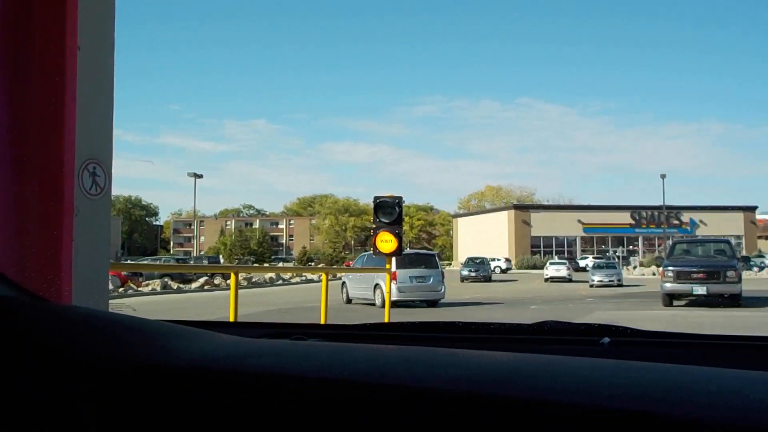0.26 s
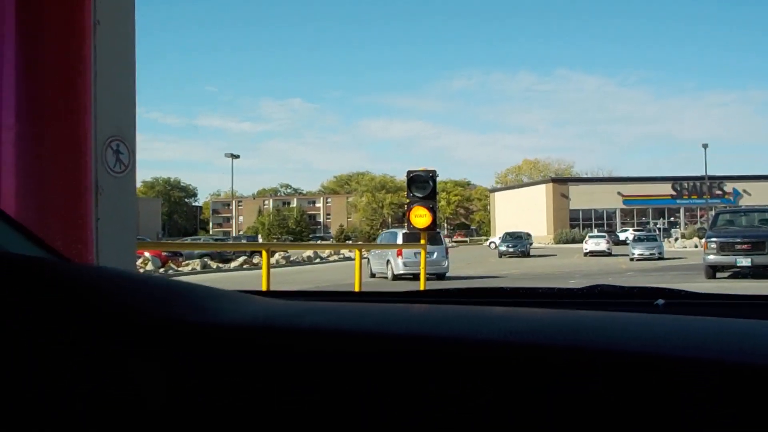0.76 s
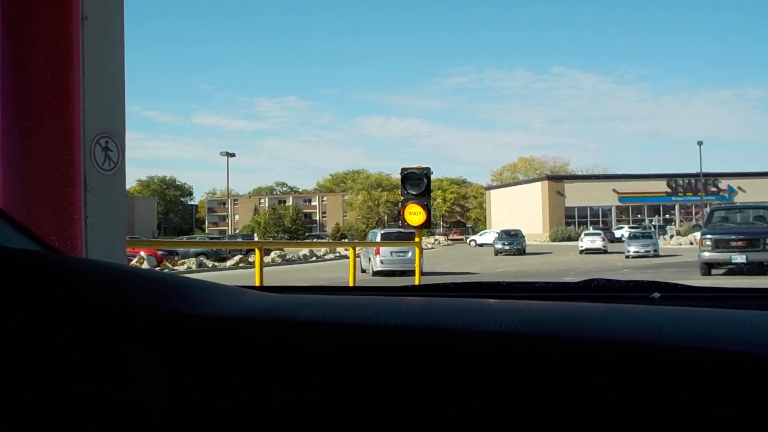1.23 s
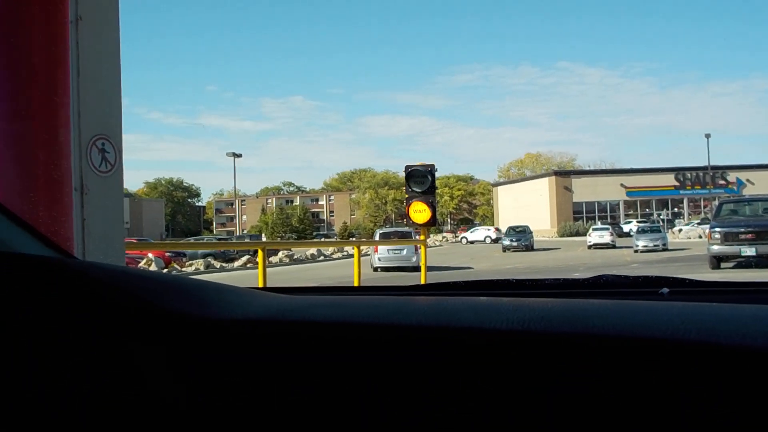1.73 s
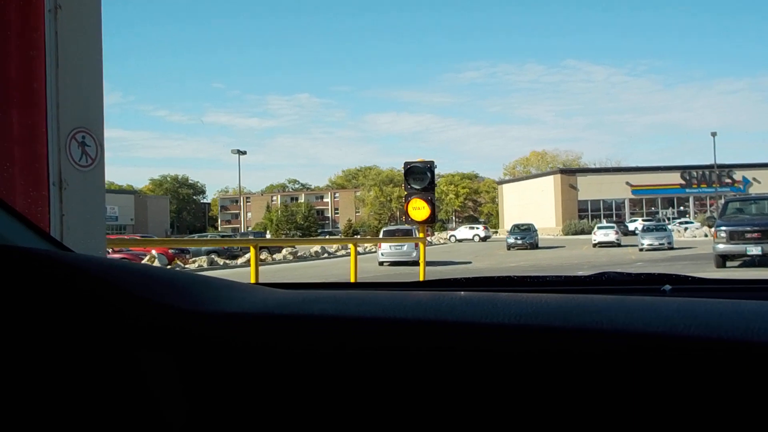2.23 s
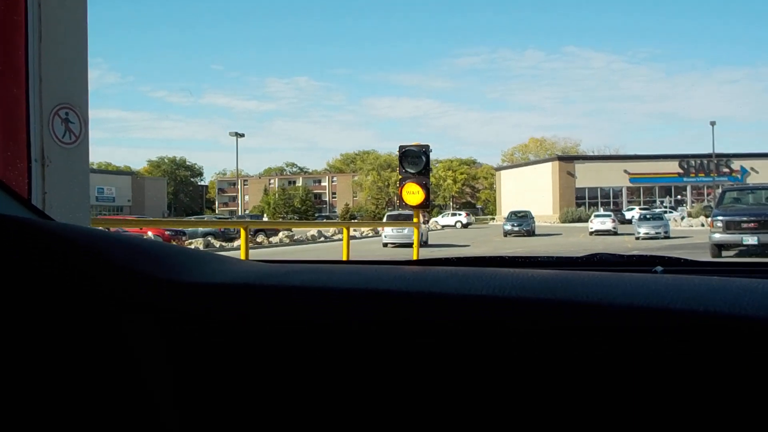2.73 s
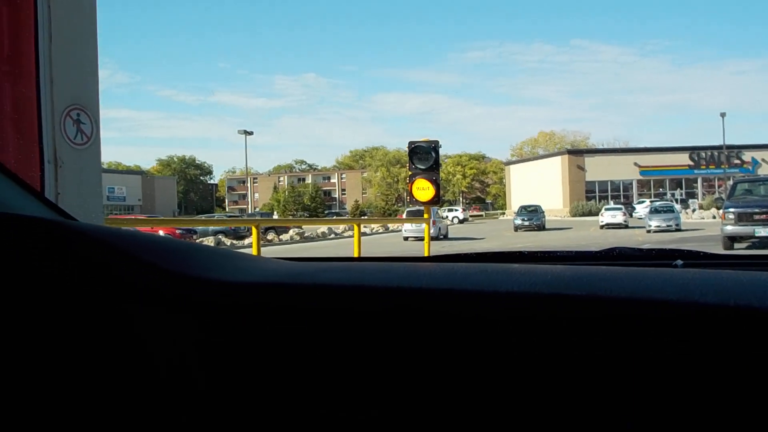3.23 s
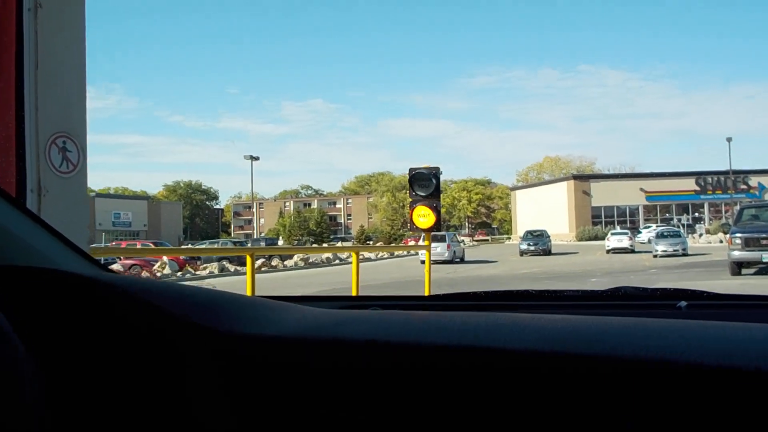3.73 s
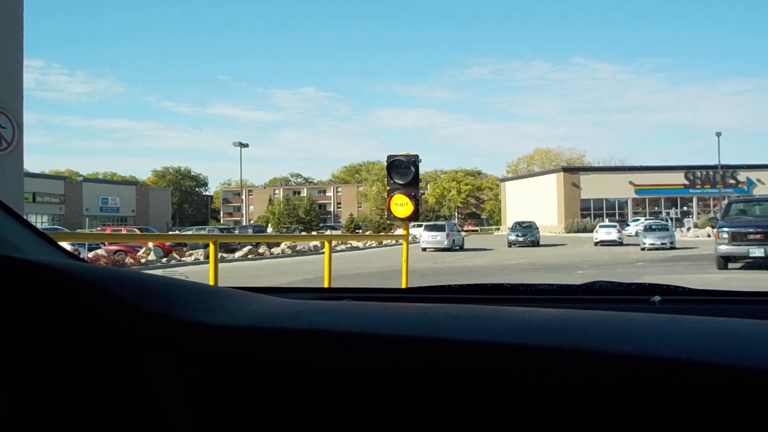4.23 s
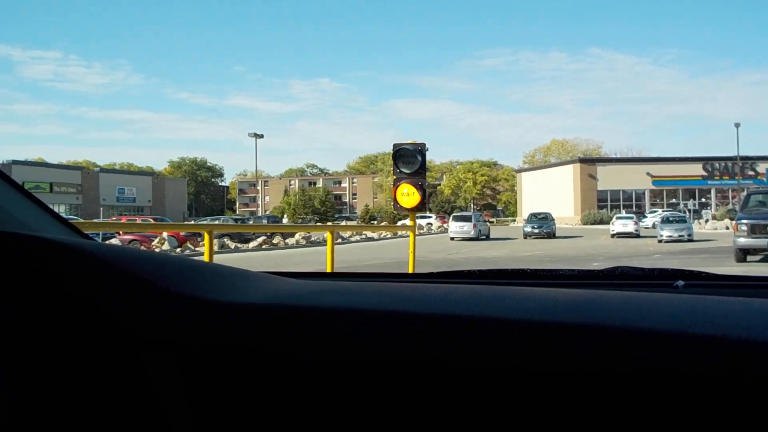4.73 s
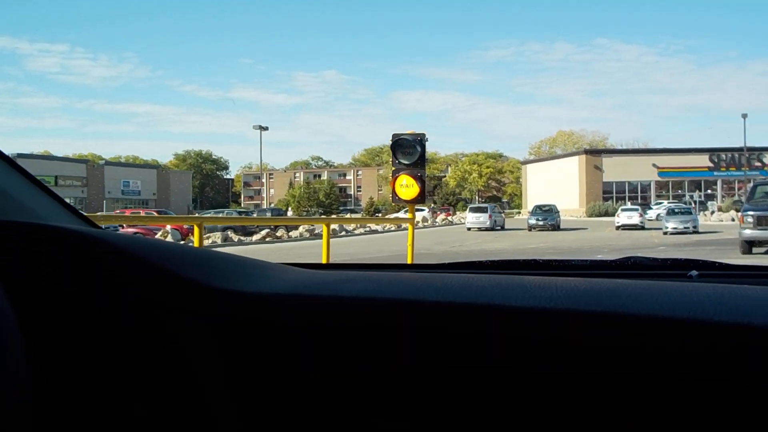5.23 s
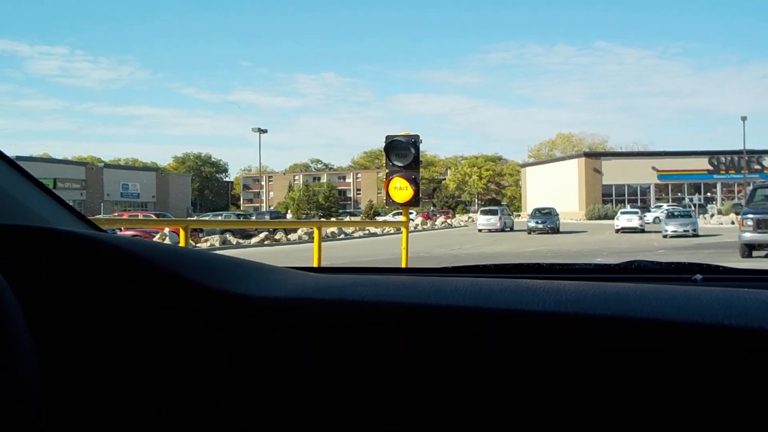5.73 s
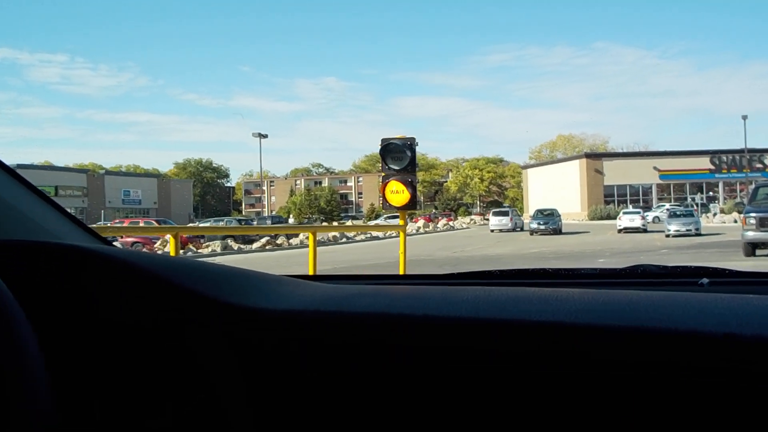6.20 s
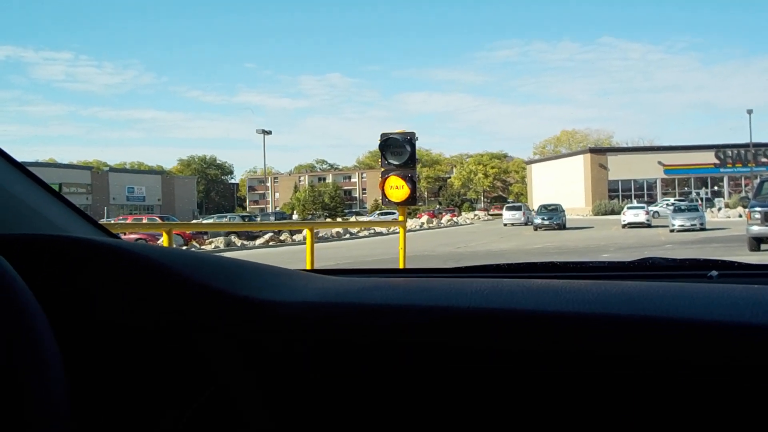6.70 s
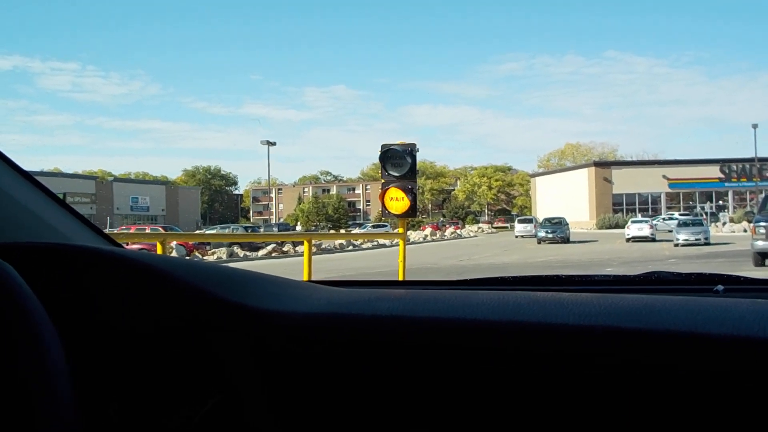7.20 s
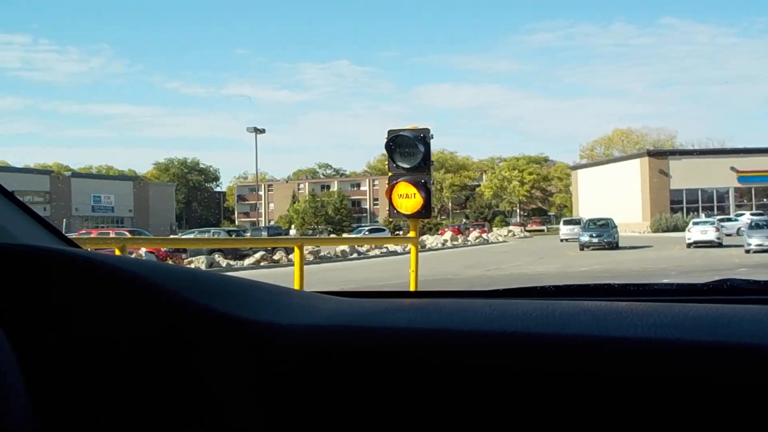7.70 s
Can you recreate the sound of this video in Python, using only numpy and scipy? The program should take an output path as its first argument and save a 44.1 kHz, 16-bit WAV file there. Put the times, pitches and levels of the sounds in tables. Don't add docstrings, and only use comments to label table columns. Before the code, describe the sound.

Dense blowing air fills a car cabin, drumming low on the roof with a brief gust at just over one second. The boom fades by about four seconds while the nozzle rush, hiss and a faint blade whine continue. The handheld stereo microphone catches dry plastic clicks, strongest on the right, that momentarily duck the sound, plus very faint electronic hiss and ticking.

```python
import sys
import numpy as np
from scipy import signal
from scipy.fft import rfft, irfft, next_fast_len
from scipy.io import wavfile
from scipy.ndimage import uniform_filter1d, map_coordinates

SR = 44100
rng = np.random.default_rng(int(sys.argv[2]) if len(sys.argv) > 2 else 0)


def persist_wave(psi):
    counts = np.round(np.clip(psi, -1, 1) * 32767).astype(np.int16)
    wavfile.write(sys.argv[1], SR, np.atleast_2d(counts).T)


def how_loud(loudness_db):
    steps = np.asarray(loudness_db, float) / 20
    return 10 ** steps


N = 350595

# (time [s], crack peak [dB], treble tilt [dB], shell ring [dB], gain dip [dB])
SHELL_CLICKS = [(.3202, -15.5, 5, -20.5, 10), (0.331, -23, -1, -16, 0), (.3941, -13.5, -2, -21, 7.5),
                (.4055, -42, 2, -23, 0), (0.414, -11, -5, -16, 8), (.4262, -50, -2, -20, 0),
                (0.461, -19.5, 10, -22.5, 3.5), (.8618, -47, -5, -39, 1), (.8870, -38, 8, -40, 1),
                (0.8900, -19.5, -3, -21, 1), (5.4975, -38, 4.5, -23, -2.5), (5.5303, -45, 0, -32, -7),
                (5.544, -23, 9, -22, -2), (5.5630, -19.5, 9, -21, 5), (5.6197, -24, 8, -21.5, -1),
                (5.6410, -44, -2, -24, 2)]
# (time [s], peak [dB], gain dip [dB])
DULL_TAP = (7.4503, -17.5, 7.5)


def unit(x):
    return x / np.sqrt(np.mean(x ** 2) + 1e-20)


def along(points, hz):
    f, v = np.transpose(points)
    return np.interp(np.log(hz + 1), np.log(f + 1), v)


def wobble(rate):
    return map_coordinates(rng.standard_normal(int(N * rate / SR) + 4), [np.arange(N) * rate / SR])


def filtered(x, response):
    m = next_fast_len(x.shape[-1] + 8192)
    spectrum = rfft(x, m) * response(np.fft.rfftfreq(m, 1 / SR))
    return irfft(spectrum, m)[..., :x.shape[-1]]


def closed(spectrum):
    fade = lambda ratio: np.sin(np.pi / 2 * np.clip(np.log(ratio) / .12 + .5, 0, 1))
    foot, top = spectrum[0][0], spectrum[-1][0]
    return lambda hz: how_loud(along(spectrum, hz)) * fade((hz + 1) / foot) * fade(top / (hz + 1))


def air(spectrum, patchy_db):
    # (frequency [Hz], likeness [0-1])
    alike = [(30, .8), (70, 0.94), (130, 0.98), (300, 1), (1400, 0.99), (2400, 1), (3100, 0.76),
             (5000, 0.67), (7000, 0.32)]
    z = signal.stft(rng.standard_normal((2, N)), nperseg=512)[2]
    patches = uniform_filter1d(rng.standard_normal(z.shape[1:]), size=4, axis=0)
    patches = uniform_filter1d(patches, size=8, axis=1)
    pair = signal.istft(z * how_loud(patchy_db * unit(patches)), nperseg=512)[1][:, :N]
    colour = closed(spectrum[1:-2])

    def mid_side(hz):
        angle = np.arccos(np.clip(along(alike, hz), 0, 1)) / 2
        return colour(hz) * [np.cos(angle), np.sin(angle)]

    mid, side = filtered(pair, mid_side)
    return np.array([mid + side, mid - side]) / np.std(mid)


def layer(full_db, db_per_db, lag_s=0):
    # (time [s], cabin roar [dB])
    force = [(0, -27.5), (.44, -25.5), (.52, -24), (.63, -26), (.75, -24.5), (1.0, -25.5), (1.27, -27.5),
             (1.33, -20.5), (1.43, -25), (1.99, -24.5), (2.1, -28.5), (2.45, -26.5), (2.65, -29),
             (3.05, -27), (3.5, -27.5), (3.8, -30.5), (4.4, -33.5), (7.95, -34.5)]
    s, db = np.transpose(force)
    force_db = np.interp(np.arange(N) / SR, s, db)
    force_db = uniform_filter1d(force_db, size=int(lag_s * SR) + 1)
    return full_db + db_per_db * (force_db + 26)


def halves(x):
    gap_hz = 550
    low = filtered(x, lambda hz: np.clip((gap_hz - hz) / 40 + .5, 0, 1))
    return [part / np.std(part.mean(axis=0)) for part in (low, x - low)]


def jets():
    # (frequency [Hz], density [dB per Hz])
    rumble_colour = [(12, -60), (20, -22.5), (32, -19.5), (44, -1.5), (52, -2), (62, -7.5), (75, -1.5),
                     (88, -10), (120, -60), (200, -120)]
    boom_colour = [(54, -60), (88, -35), (100, -25.5), (110, -15), (125, 2), (142, -4), (165, 0.5),
                   (185, -5), (200, -3), (280, -60), (470, -120)]
    near_colour = [(120, -47), (200, -28.5), (269, -6.5), (345, -11), (375, -6.5), (437, 0.5), (472, -4),
                   (510, 1), (549, -11.5), (590, -0.5), (622, -5), (659, 0.5), (720, -7.5), (1000, -12),
                   (1300, -43), (2200, -120)]
    past_colour = [(120, -71), (200, -36), (226, -25.5), (248, -20), (280, -10.5), (308, -11.5), (334, -6),
                   (367, -9), (449, -1.5), (493, -8.5), (557, -10.5), (603, -5), (862, -10.5), (1000, -11),
                   (1300, -42), (2200, -120)]
    boom_db = layer(-43.5, 1.99, lag_s=0.72)
    low_db, high_db = layer(-28.5, 0.92), layer(-29, 0.99)
    near = np.clip((uniform_filter1d(boom_db, size=SR // 2) + 58) / 13, 0, 1)

    rumble = how_loud(-76.0 + 3 * near) * air(rumble_colour, patchy_db=2.0)
    boom = how_loud(boom_db) * air(boom_colour, patchy_db=0.4)
    under = halves(air(near_colour, patchy_db=0.6))
    past = halves(air(past_colour, patchy_db=0.2))
    roar = 0
    for db, a, b in zip((low_db, high_db), under, past):
        roar = roar + how_loud(db) * (np.sqrt(near) * a + np.sqrt(1 - near) * b)
    return rumble + boom + roar


def glass():
    # (frequency [Hz], density [dB per Hz])
    rush_colour = [(590, -30), (1000, 0), (1130, -1.5), (1210, -2), (1450, -3.5), (1570, -6), (1880, -10.5),
                   (2010, -14), (2210, -22), (2340, -34.5), (2420, -32), (3150, -66), (5320, -120)]
    hiss_colour = [(1420, -50), (2420, -20.5), (2740, -4.5), (3050, -16.5), (3370, -6), (3710, -4),
                   (4000, -5), (4700, -10.5), (5050, -5), (5220, 0.5), (5450, -1.5), (5950, -3),
                   (7000, -5.5), (7410, -20.5), (7800, -38), (10300, -75), (17400, -120)]
    # (frequency [Hz], rms level [dB])
    blade_tone = (1945, -66.5)
    lag_s, hiss_top_hz = 0.8, 7640
    rush_db = layer(-36, 0.21, lag_s) - 0.76 + 0.38 * wobble(9)
    hiss_db = layer(-46.5, 0.046, lag_s) - 0.24 + 0.17 * wobble(12)
    rush = how_loud(rush_db) * air(rush_colour, patchy_db=0.5)
    hiss = how_loud(hiss_db) * air(hiss_colour, patchy_db=0.03)

    blade_phase = 2 * np.pi * np.cumsum(blade_tone[0] + 1.54 * wobble(3)) / SR
    blade = np.sin(blade_phase) * how_loud(blade_tone[1] + 8.5 + 2.5 * wobble(2.9))
    notch = lambda hz: how_loud(-4 * np.exp(-((hz - 2440) / 90) ** 2))
    return filtered(rush + hiss, lambda hz: notch(hz) * (hz < hiss_top_hz)) + blade


def seals():
    # (pitch [Hz], width [Hz])
    seal_pitch = [
        (4170, 70),
        (6150, 120),
    ]
    # (peak time [s], rise [s], fall [s], peak [dB])
    seal_swells = [
        [(3.9, .6, .15, -58), (7.6, 1.4, 1.5, -67)],
        [(4.3, 0.49, 0.73, -54), (6.8, 0.9, 2.5, -57)],
    ]
    rest_db = -74.5
    t = np.arange(N) / SR
    narrow = lambda hz: np.array([np.exp(-((hz - centre) / width) ** 2) for centre, width in seal_pitch])
    tones = filtered(rng.standard_normal((2, N)), narrow)
    whistles = np.zeros(N)
    for swells, tone in zip(seal_swells, tones):
        level = how_loud(rest_db)
        for s, rise, fall, db in swells:
            level = level + how_loud(db) * np.exp(-((t - s) / np.where(t < s, rise, fall)) ** 2)
        whistles += level * unit(tone)
    return whistles


def ports(x):
    # (frequency [Hz], left leads by [rad])
    port_tilt = [(30, 2), (110, 0.5), (200, -2.5), (380, -3), (700, -3.5), (1290, -4), (2380, -4.5),
                 (3100, -0.5), (4400, -2.5), (5250, -6.5), (6200, -2), (7500, -4)]
    port_lead = [(60, -0.78), (130, -0.61), (260, -0.34), (700, -0.12), (2670, 0.29), (4900, -0.28),
                 (6100, 0.38), (8000, .2)]
    left = lambda hz: how_loud(along(port_tilt, hz) / 2) * np.exp(.5j * along(port_lead, hz))
    return filtered(x, lambda hz: np.array([left(hz), 1 / left(hz)]))


def electronics(dip_db, sound):
    # (frequency [Hz], density [dB per Hz])
    preamp_colour = [(8000, -9), (9300, -9), (10000, -6.5), (12000, -3.5), (16800, -1.5)]
    foot_hz, top_hz = 9070, 15790
    tick_hz, first_tick_s = 58.6959, .01093
    band = lambda hz: closed(preamp_colour)(hz) * (hz < top_hz) * (hz > foot_hz)
    shared, own = unit(filtered(rng.standard_normal((2, N)), band)) * how_loud([[-73], [-77.5]])
    hiss = np.array([shared + own, shared - own]) * how_loud([[-.6], [.6]])

    at = first_tick_s + np.arange(int(N / SR * tick_hz)) / tick_hz
    at = (at + .5 / tick_hz * (at > DULL_TAP[0])) * SR
    at = at[dip_db[at.astype(int)] == 0]
    near = np.floor(at)[:, None] + np.arange(-7, 9)
    offset = near - at[:, None]
    spikes = np.zeros(N)
    np.add.at(spikes, near.astype(int), np.sinc(offset) * np.cos(offset * np.pi / 18) ** 2)

    steps = (np.diff(dip_db, append=0) < 0) * sound
    return hiss + filtered(how_loud(-15.5) * steps - how_loud(-38.5) * spikes, band)


def burst(spectrum, seconds):
    t = np.arange(SR // 50) / SR - .001
    shape = np.sin(np.pi * np.clip(t / seconds, 0, 1)) ** 2
    x = filtered(shape * rng.standard_normal(len(t)), lambda hz: how_loud(along(spectrum, hz)))
    return x / np.abs(x).max()


def ringing(modes, t):
    tones = sum(how_loud(db - 60 * t / t60) * np.sin(2 * np.pi * hz * t) for hz, db, t60 in modes)
    return tones * (1 - np.exp(-t / 0.0011))


def shell():
    # (frequency [Hz], density [dB])
    snap_colour = [(1200, -15), (2300, -27), (3500, -7), (5200, 3.5), (6200, -9), (7300, -4), (8200, -19),
                   (9500, -16.5), (12300, -10), (15500, -14), (16800, -26)]
    tap_colour = [(290, -35), (500, -13), (1350, 17.5), (2810, -24), (4420, 1), (6100, -29), (7940, -30),
                  (9060, -24), (11800, -24), (14000, -19), (16500, -40)]
    # (frequency [Hz], level [dB], t60 [s])
    shell_modes = [(2143, -3, 0.015), (2750, -9, 0.019)]
    knock_modes = [(1090, 7, 0.0066), (1380, 2, .006), (1900, -1.5, 0.01), (2850, -8, 0.015),
                   (3290, -5, 0.0085), (4400, 2.5, 0.0052), (8900, -19, 0.0042)]
    out, t = np.zeros((2, N + SR)), np.arange(SR // 50) / SR

    def add(s, sound):
        out[:, round((s - .001) * SR):][:, :len(t)] += sound

    for s, crack_db, treble_db, ring_db, _ in SHELL_CLICKS:
        colour = [(hz, db + treble_db * (hz > 6500)) for hz, db in snap_colour]
        crack = how_loud(crack_db) * burst(colour, seconds=0.0014) * how_loud([[-22], [0]])
        ring = how_loud(ring_db + 3.5) * ringing(shell_modes, t) * how_loud([[-15], [0]])
        add(s, crack + ring)

    thin = [(2000, -46)] + tap_colour[4:]
    crack = np.array([burst(thin, seconds=0.0022), burst(thin, seconds=0.0014)]) * how_loud([[0], [-6]])
    knock = -np.roll(ringing(knock_modes, t), SR // 1000) * how_loud([[3], [7]])
    notch = lambda hz: how_loud(-16 * np.exp(-((hz - 2450) / 170) ** 2))
    add(DULL_TAP[0], how_loud(DULL_TAP[1]) * filtered(crack + knock, notch))
    return out[:, :N]


def gain_dip():
    step_db, climb_db_per_s = .75, 170
    t, dip_db = np.arange(N) / SR, np.zeros(N)
    for s, *_, depth_db in SHELL_CLICKS + [DULL_TAP]:
        since = t - s - .002
        dip_db = np.maximum(dip_db, (depth_db - climb_db_per_s * since) * (since > 0))
    return np.ceil(dip_db / step_db) * step_db


def scene():
    cabin = ports(jets() + glass() + seals())
    clicks = filtered(shell(), lambda hz: (1j * hz / (600 + 1j * hz)) ** 2)
    return cabin + clicks


def top_cut(x):
    return signal.sosfilt(signal.butter(12, 16670, fs=SR, output="sos"), x)


def record(dry):
    top_hz = 16600
    dip_db = gain_dip()
    gain = how_loud(-uniform_filter1d(dip_db, size=70))
    ducked = (dry + electronics(dip_db, dry)) * gain
    heard = filtered(ducked, lambda hz: np.clip((top_hz - hz) / 700, 0, 1))
    return top_cut(heard)


dry = scene()
out = record(dry)
persist_wave(out)
```